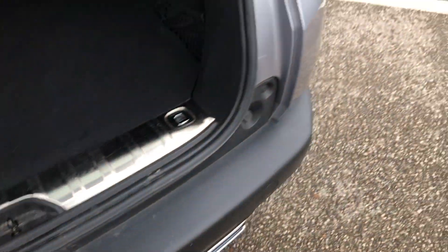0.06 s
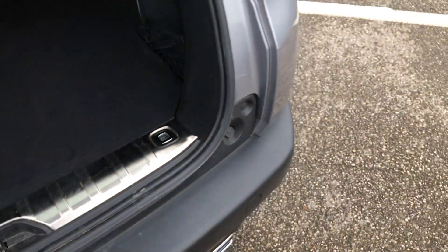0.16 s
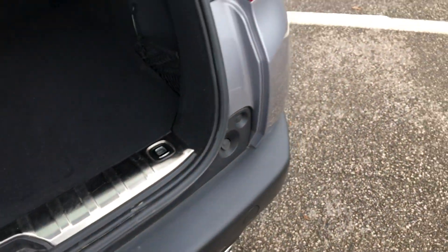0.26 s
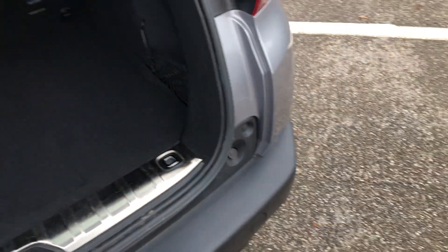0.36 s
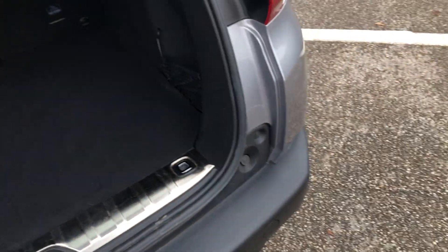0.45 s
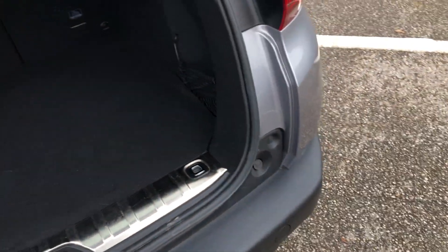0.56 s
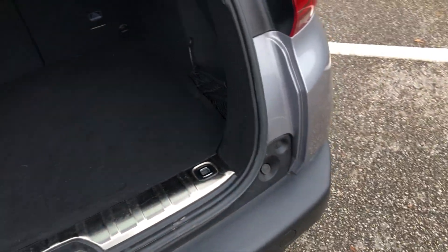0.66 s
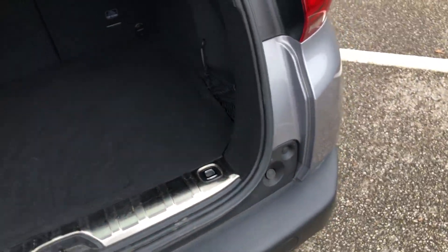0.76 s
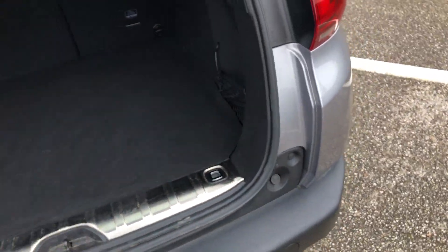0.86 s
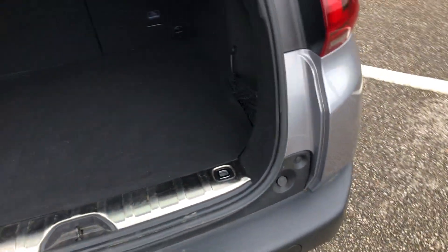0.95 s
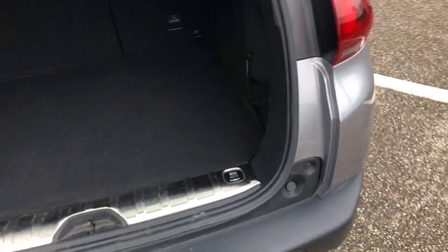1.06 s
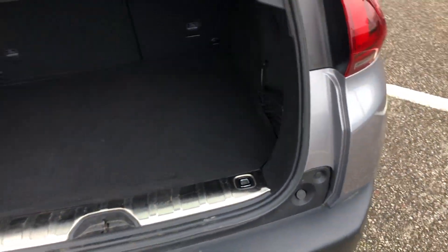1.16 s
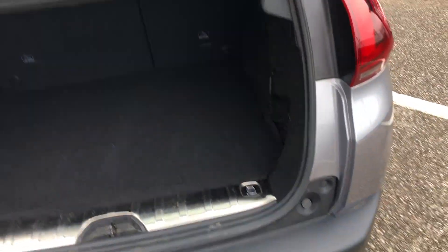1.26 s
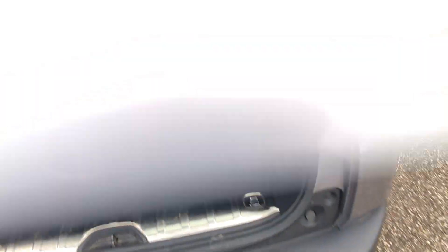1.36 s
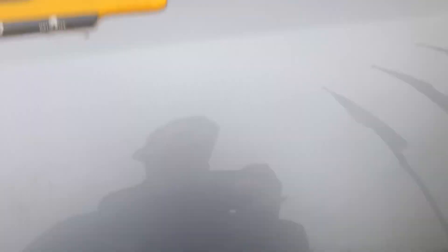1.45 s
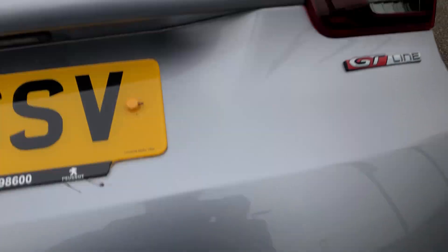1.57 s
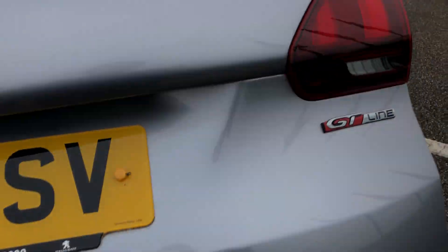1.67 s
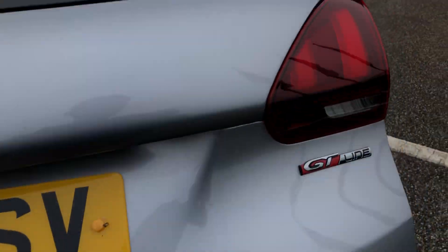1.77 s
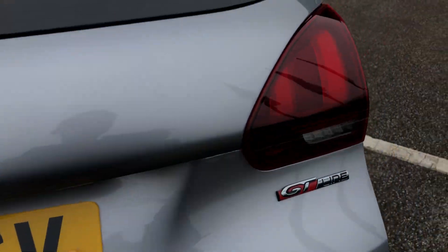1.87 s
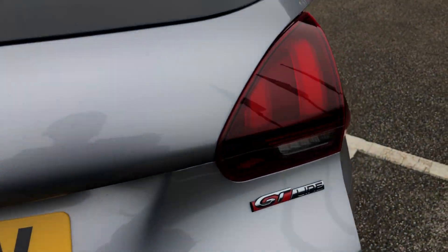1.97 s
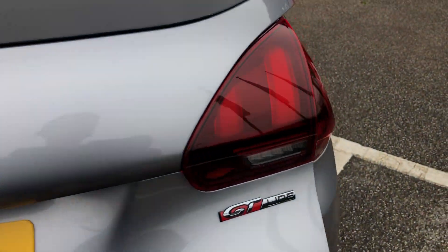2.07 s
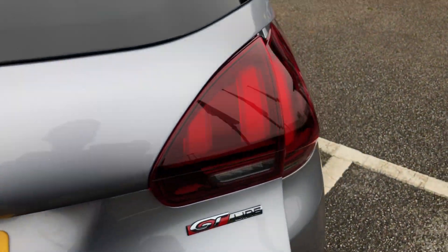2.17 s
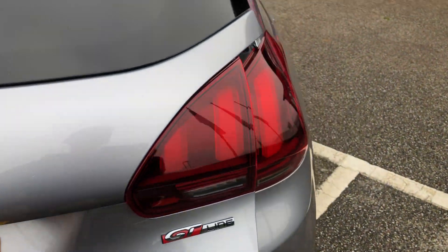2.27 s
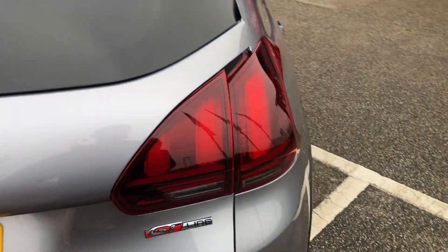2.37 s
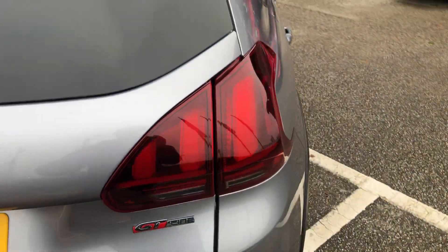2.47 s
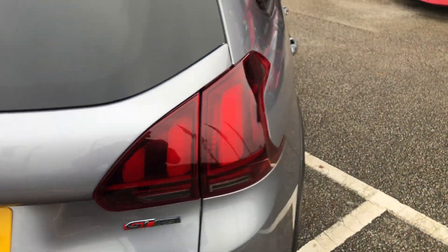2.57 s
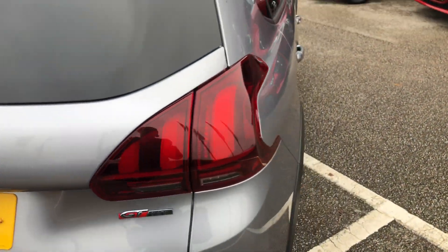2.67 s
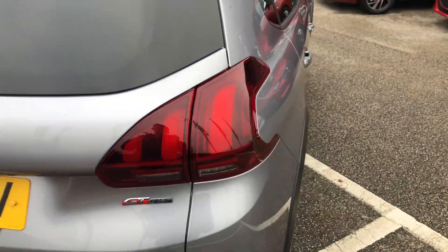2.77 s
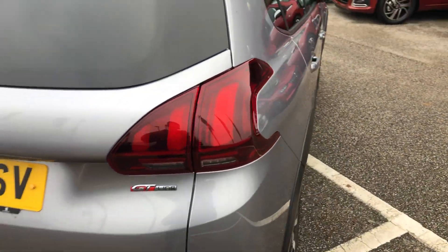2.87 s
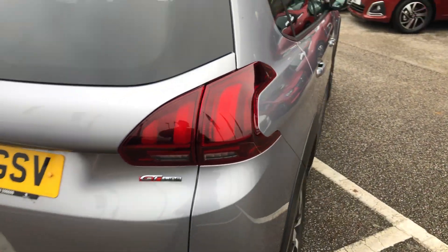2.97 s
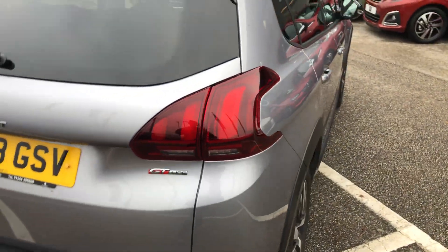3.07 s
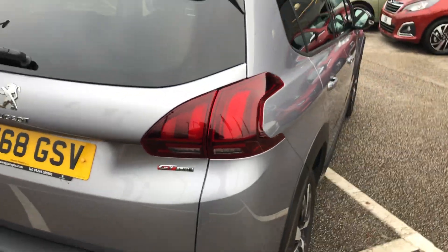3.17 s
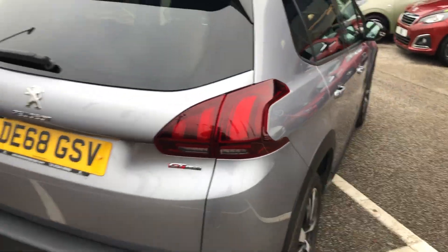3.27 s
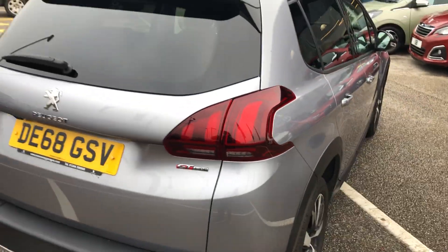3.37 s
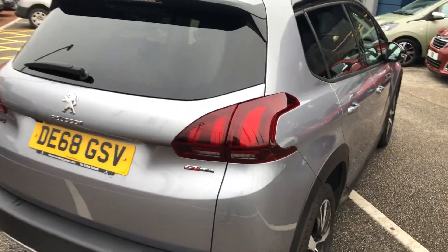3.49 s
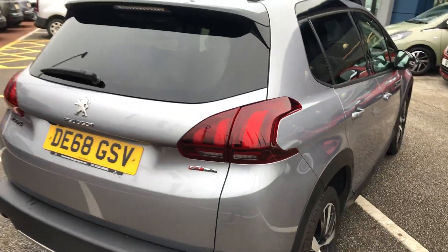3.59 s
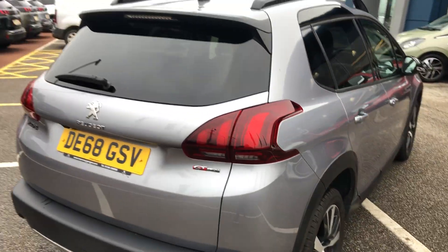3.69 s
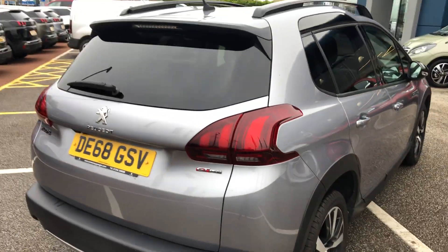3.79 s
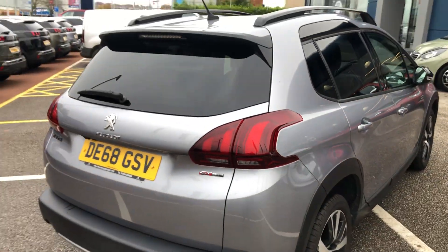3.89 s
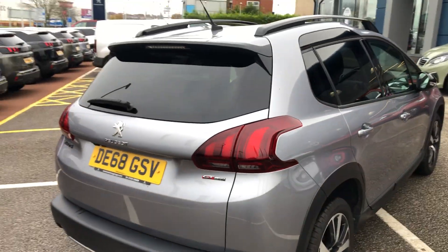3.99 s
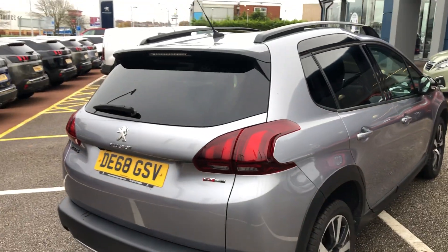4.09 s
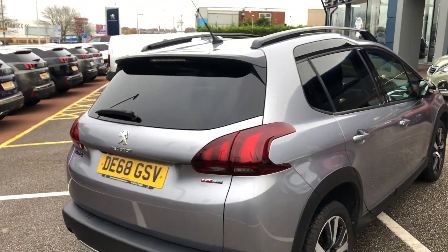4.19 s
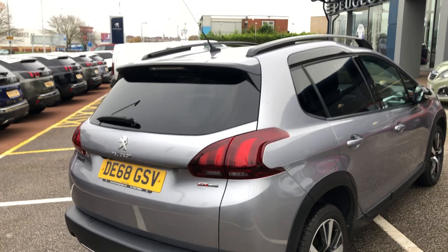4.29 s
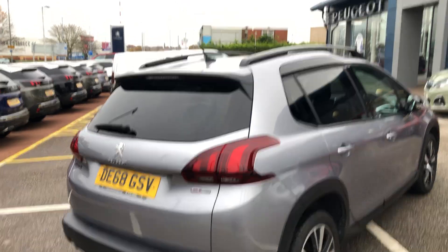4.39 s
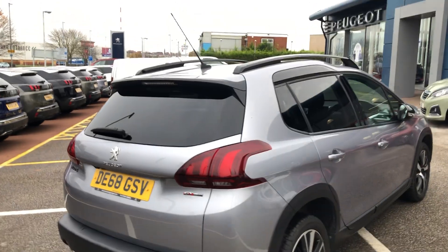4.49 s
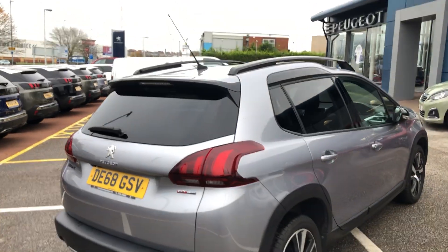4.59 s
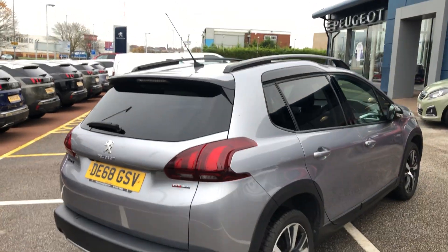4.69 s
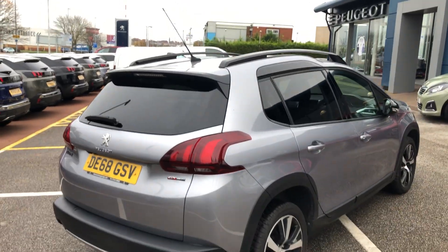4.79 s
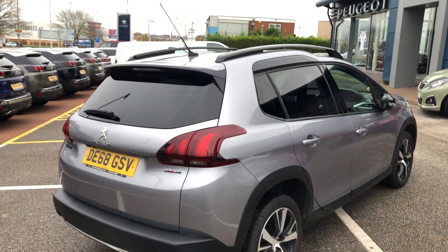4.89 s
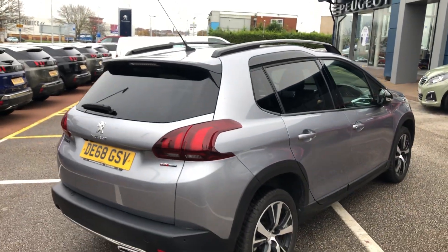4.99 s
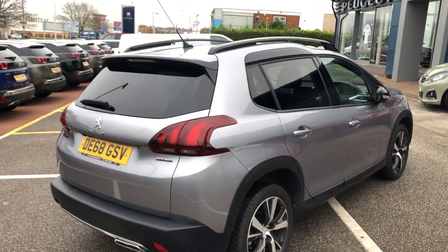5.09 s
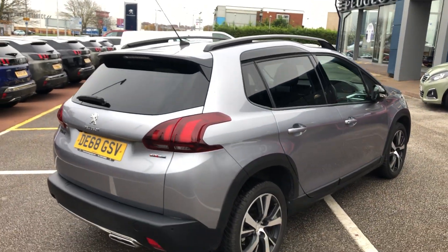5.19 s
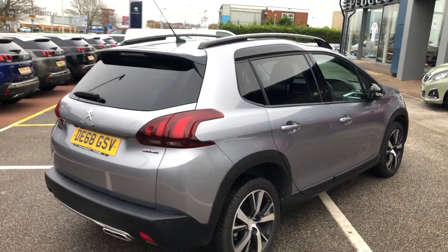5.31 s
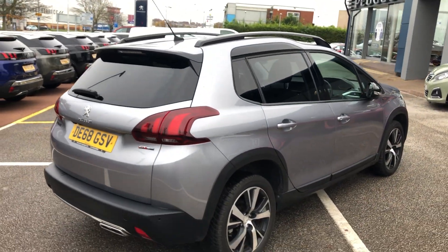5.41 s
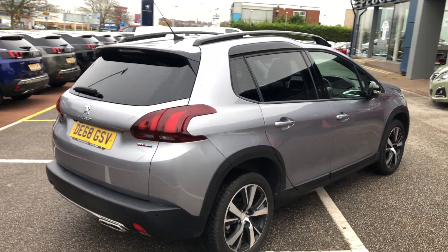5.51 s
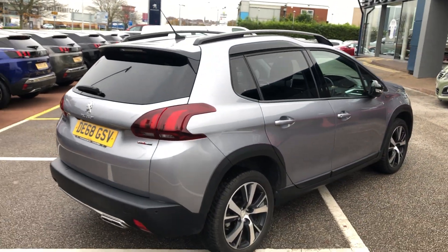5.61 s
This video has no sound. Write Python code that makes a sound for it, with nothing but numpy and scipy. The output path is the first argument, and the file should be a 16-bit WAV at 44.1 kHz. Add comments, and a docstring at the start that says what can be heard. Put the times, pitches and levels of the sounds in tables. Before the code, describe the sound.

Outdoors, soft knocks lead to one loud slam of a car boot lid, followed by small clicks, distant traffic and light wind.

```python
"""Tailgate slam in an open car lot

A hatchback's tailgate is pulled down by hand, knocking dully, and slammed: the latch touches and
snaps home, the steel panel rings and the trapped cabin air booms. Shoes scuff gritty asphalt, trim
clicks and a sleeve swishes. Distant traffic, a light breeze and a thin, high sizzle sit behind."""
import sys
import numpy as np
from scipy import signal
from scipy.fft import rfft, irfft
from scipy.io import wavfile
from scipy.ndimage import uniform_filter1d

SR = 44100
rng = np.random.default_rng(int(sys.argv[2]) if len(sys.argv) > 2 else 0)


def generate_wav(sig):
    """Save sig (samples, or channels by samples) to the path in sys.argv[1] as 16-bit PCM at SR."""
    pcm = np.round(np.clip(np.atleast_2d(sig).T, -1, 1) * 32767).astype(np.int16)
    wavfile.write(sys.argv[1], SR, pcm)


N = 249165
T = np.arange(N) / SR
AGE = T[:SR]  # the second after a blow


def amp(db):
    """Decibels to gain."""
    return 10 ** (np.asarray(db) / 20)


def unit(x):
    """Scale to rms 1."""
    return x / np.std(x)


def add(out, start, x):
    """Mix x in at start seconds."""
    i = int(start * SR)
    out[i:i + len(x)] += x[:N - i]


def bell(t, middle, half):
    """A smooth swell to 1 and back."""
    return np.exp(-((t - middle) / half) ** 2)


def fade(t60):
    """Free decay, 60 dB in t60 seconds."""
    return np.exp(-np.log(1000) * AGE / t60)


def ring(modes):
    """Sum of struck modes: (frequency [Hz], level [dB], t60 [s])."""
    return sum(amp(db) * fade(t60) * np.sin(2 * np.pi * hz * AGE) for hz, db, t60 in modes)


def wobble(rate_hz):
    """Smooth random modulation with a spread of 1."""
    hold = int(SR / rate_hz)
    steps = np.repeat(rng.standard_normal(N // hold + 1), hold)
    return unit(uniform_filter1d(steps, hold)[:N])


def noise(colour, size):
    """Noise of rms 1, shaped by points of (frequency [Hz], relative level [dB])."""
    hz, db = np.transpose(colour)
    bins_hz = np.fft.rfftfreq(size, 1 / SR) + 1
    gain = amp(np.interp(np.log(bins_hz), np.log(hz), db))
    return unit(irfft(rfft(rng.standard_normal(size)) * gain, size))


def noise_band(hz, q):
    """A second of noise through one resonance."""
    resonance = signal.iirpeak(hz, max(q, 1), fs=SR)
    return unit(signal.lfilter(*resonance, rng.standard_normal(SR)))


def soften(x, hz):
    """Roll off the treble above hz."""
    return signal.sosfilt(signal.butter(2, min(hz, 0.45 * SR), fs=SR, output="sos"), x)


def traffic(level_db=-50.5, rise_start=2.64, rise_db_per_s=1.13, drift_db=0.46):
    """Tyre wash of distant roads: steady, then growing as the listener steps clear of the car."""
    # road wash spectrum: (frequency [Hz], relative density [dB])
    colour = [(50, -32), (100, -9.5), (270, -6), (400, -10.5), (720, -12.5), (930, -7.5), (1200, -13),
              (1500, -14), (1850, -16.5), (2400, -24), (4300, -30.5), (6300, -37.5), (9500, -45),
              (15500, -49.5)]
    rise_db = rise_db_per_s * np.maximum(T - rise_start, 0)
    return noise(colour, N) * amp(level_db + rise_db + drift_db * wobble(8.7))


def breeze(lull_db=-52.5, buffet_db=1.4):
    """A light breeze buffets the microphone in low, rumbling gusts."""
    # wind rumble spectrum: (frequency [Hz], relative density [dB])
    colour = [(20, -25), (40, -4), (62, 2), (100, -3.5), (170, -9.5), (300, -19), (700, -57)]
    # gusts: (middle [s], half length [s], lift [dB])
    gusts = [(3.45, 0.24, 3), (4.53, .11, 7.5), (4.98, .09, 7), (5.45, .42, 5.5)]
    gust_db = sum(lift * bell(T, middle, half) for middle, half, lift in gusts)
    return noise(colour, N) * amp(lull_db + gust_db + buffet_db * wobble(10))


def sizzle(upper_ratio=1.37, upper_db=-11.5, wander_hz=100, edge_s=.25, pulse_hz=3.9, pulse_fade_s=1.3):
    """Narrow, wavering hiss with a weaker band above; each spell swells or fades as its pitch sinks."""
    # spells of sizzle: (start [s], length [s], level [dB], swell [dB/s], first pitch [Hz],
    # settled pitch [Hz], settling time [s], width [Hz], pulse depth [dB])
    spells = [(.94, 1.03, -51.5, -30.5, 9400, 7850, .11, 450, 0),
              (3.04, 3.0, -78.5, 3.9, 8100, 7330, 2.2, 330, 7)]
    out = np.zeros(N)
    for start, length, db, swell, first_hz, settled_hz, settling, width_hz, depth_db in spells:
        age = np.clip(T - start, 0, length)
        gate = np.clip(np.minimum(age, length - age) / edge_s, 0, 1)
        pulse_db = -depth_db * np.exp(-age / pulse_fade_s) * np.cos(2 * np.pi * pulse_hz * age)
        hz = settled_hz + (first_hz - settled_hz) * np.exp(-age / settling) + wander_hz * wobble(14)
        phase = 2 * np.pi * np.cumsum(hz) / SR
        lower = unit(soften(rng.standard_normal(N), width_hz) * np.sin(phase))
        upper = unit(soften(rng.standard_normal(N), width_hz) * np.sin(upper_ratio * phase))
        bands = lower + amp(upper_db + 2.5 * wobble(8)) * upper
        out += bands * gate * amp(db + swell * age + pulse_db + 1.5 * wobble(14))
    return out


def lot_echo(x, wet_db=-30, t60=0.45, dull_hz=2500, build_s=.02):
    """Parked cars and the showroom front scatter a faint, dull echo."""
    tail = soften(rng.standard_normal(SR), dull_hz) * fade(t60) * (1 - np.exp(-AGE / build_s))
    return amp(wet_db) * signal.fftconvolve(x, tail / np.linalg.norm(tail))[:N]


def sleeve(attack_s=0.11, release_s=0.16, rustle_db=-68, rustle_end=2.9, fade_s=.35, flutter_db=1):
    """Cloth hiss: each arm stroke swells over a faint rustle that dies away once the lid is shut."""
    # arm strokes: (peak time [s], level [dB])
    strokes = [(.07, -58.5), (1.07, -55.5), (1.26, -54.5), (1.57, -62), (1.94, -64.5), (2.12, -65),
               (2.84, -62.5), (3.68, -74)]
    # cloth hiss spectrum: (frequency [Hz], relative density [dB])
    colour = [(2500, 2), (4200, -0.5), (6500, 0.5), (8500, 1), (11000, 0.5), (13000, -1), (15500, 3)]
    rustle = amp(rustle_db) * np.exp(-np.maximum(T - rustle_end, 0) / fade_s)
    power = rustle ** 2
    for peak, db in strokes:
        stroke = amp(db) * bell(T, peak, np.where(T < peak, attack_s, release_s))
        power += stroke ** 2
    return noise(colour, N) * np.sqrt(power) * amp(flutter_db * wobble(40.1))


def clicks(t60=0.023, snap_db=-5, snap_hz=12000):
    """Dry clicks of trim and grit, snappier when high and broad."""
    # trim and grit clicks: (time [s], level [dB], centre [Hz], sharpness [Q])
    hits = [(.5358, -37, 1600, 1.2), (.829, -46.5, 3300, 0.87), (1.130, -40.5, 1490, 1.1),
            (2.2825, -35.5, 3010, 7.5), (2.440, -44.5, 4600, 2.1), (2.4583, -39.5, 1600, 1.4),
            (2.926, -45.5, 5230, 1.2), (2.972, -39, 2110, 0.88), (3.298, -40, 1100, 1.7),
            (3.3119, -33.5, 1000, 2.3), (3.3347, -41, 2300, 1.4), (3.347, -35.5, 1410, 1.3),
            (3.3568, -42, 2930, 5), (3.3576, -33, 1020, 2.4), (3.381, -38, 1050, 2.1),
            (4.319, -52, 3300, 2.4)]
    out = np.zeros(N)
    for start, db, hz, q in hits:
        body = unit(soften(noise_band(hz, q), 2 * hz))
        snap = amp(snap_db) * hz / snap_hz / q * noise_band(snap_hz, 1)
        add(out, start, amp(db) * (body + snap) * fade(t60))
    return out


def scuffs(grit_db=2.5, rub_q=1.8, hiss_hz=12000):
    """Soles and trim rub briefly, catching and slipping on grit."""
    # rubs: (middle [s], half length [s], rub level [dB], centre [Hz], fine hiss level [dB])
    rubs = [(.55, .028, -48, 520, -69), (1.101, .016, -45, 900, -75), (1.137, .023, -43.3, 1030, -75),
            (1.65, .025, -61, 4100, -85), (2.104, 0.098, -59, 3900, -75), (2.24, 0.019, -44, 400, -59.5),
            (2.696, .018, -48.5, 2230, -55.5), (2.919, .03, -56, 1470, -72), (3.328, .025, -40.5, 620, -63),
            (3.644, .016, -68, 11000, -60), (4.323, .013, -46, 400, -74)]
    out = np.zeros(N)
    for middle, half, db, hz, hiss_db in rubs:
        grit = amp(grit_db * wobble(400)[:SR])
        rub = amp(db) * unit(soften(noise_band(hz, rub_q), 3 * hz) * grit)
        hiss = amp(hiss_db) * unit(noise_band(hiss_hz, 1) * grit)
        add(out, middle - .5, (rub + hiss) * bell(AGE, 0.4992, half))
    return out


def hand_knocks(spread=0.3, contact_s=0.0044):
    """A padded hand pushes slowly and wakes mostly the lid modes near the pace of its push."""
    # dull knocks on the lid, with one faint thump after it shuts:
    # (time [s], level [dB], centre of the push [Hz])
    knocks = [(.548, -31, 285), (.806, -35, 292), (.898, -35, 231), (.948, -37.5, 169), (1.098, -33.5, 196),
              (1.435, -33.5, 160), (1.458, -31, 170), (1.497, -25, 256), (1.550, -19.5, 191),
              (1.567, -22.5, 135), (1.594, -22.5, 460), (1.6, -23.5, 205), (1.615, -28, 140),
              (1.644, -27.5, 128), (1.755, -35, 158), (2.165, -33.5, 149), (2.178, -34.5, 87),
              (3.459, -35.5, 295)]
    # modes of the lid with its trim: (frequency [Hz], relative level [dB], t60 [s])
    lid_modes = [(82.7, 4, 0.15), (122.3, 4.5, 0.047), (151.5, 6.5, 0.066), (205, 6, 0.051),
                 (274, 1, 0.062), (380, -12, 0.11), (474, 3.5, 0.039)]
    out = np.zeros(N)
    attack = 1 - np.exp(-(AGE / contact_s) ** 2)
    for start, knock_db, push_hz in knocks:
        woken = [(hz, db - 6 * np.log2(hz / push_hz) ** 2 / spread, t60) for hz, db, t60 in lid_modes]
        add(out, start, amp(knock_db) * ring(woken) * attack)
    return out


def cabin_boom(start=2.5808, push_hz=61, push_s=0.055, push_db=-15.5, sway_start=2.595, build_s=0.027):
    """The lid squeezes the cabin air for a few heavy cycles, then air and shell sway on."""
    # modes of cabin air and body shell: (frequency [Hz], level [dB], t60 [s])
    cabin_modes = [(49.2, -39, 0.98), (71.9, -27, 0.82), (78, -37, 0.57), (115.6, -32, 0.32),
                   (144, -32.5, 0.38), (165.6, -31.5, 0.27), (216, -30, 0.34)]
    out = np.zeros(N)
    swell = np.sin(np.pi * np.minimum(AGE / push_s, 1)) ** 2
    add(out, start, amp(push_db) * swell * np.sin(2 * np.pi * push_hz * AGE))
    add(out, sway_start, ring(cabin_modes) * (1 - np.exp(-AGE / build_s)))
    return out


def panel_ring(start=2.5835, gain_db=1.5, build_s=0.0025):
    """The whole steel skin rings once the lid comes home against its stops."""
    # modes of the tailgate skin: (frequency [Hz], relative level [dB], t60 [s])
    skin_modes = [(277.6, -13.5, 0.11), (332, -23.5, 0.25), (398, -20, 0.16), (433.5, -27, 0.16),
                  (525, -33, 0.22), (800, -23.5, 0.14), (870, -24.5, 0.15), (1037, -29, 0.12),
                  (1113, -32, 0.2), (1175, -38, 0.16), (1246, -39, 0.23), (1430, -37, 0.16),
                  (1704, -38, 0.14), (2013, -31.5, 0.13), (2390, -26, 0.08), (2616, -29, 0.11),
                  (3300, -34, 0.13), (3340, -37, 0.1), (3570, -34, 0.12), (3830, -36, 0.13),
                  (4100, -44, 0.11), (4340, -43, 0.1), (4920, -43, 0.13)]
    out = np.zeros(N)
    add(out, start, amp(gain_db) * ring(skin_modes) * (1 - np.exp(-AGE / build_s)))
    return out


def clatter():
    """Dense panel modes as noise bands; the low ones take longer to build and to die."""
    # the skin's crowd of finer modes: (frequency [Hz], relative density [dB], t60 [s])
    bands = [(60, -6, .5), (130, -3.5, 0.7), (323, 0.5, 0.31), (666, -4.5, 0.18), (970, 1, 0.15),
             (1500, -11.5, 0.17), (2400, -4.5, 0.085), (3940, -7, 0.11), (5800, -22, 0.15),
             (9000, -19.5, .09), (15000, -16, .08)]
    centres, levels, decays = np.transpose(bands)
    spectrum = rfft(noise(np.transpose([centres, levels]), SR))
    log_hz = np.log(np.arange(len(spectrum)) + 1)
    out = np.zeros(SR)
    for hz, t60, solo in zip(centres, decays, np.eye(len(centres))):
        crossfade = np.interp(log_hz, np.log(centres), solo)  # 1 at this centre, 0 at its neighbours
        out += irfft(spectrum * crossfade, SR) * fade(t60) * (1 - np.exp(-AGE * hz))
    return out


def slam(crack_t60=0.032):
    """Latch and seal meet in a quick run of blows; each cracks and shakes another part of the lid."""
    # latch and panel blows: (time [s], level [dB], brightness [Hz], relative crack level [dB])
    blows = [(2.5700, -21, 1430, -15), (2.5812, -21, 7000, 4), (2.5840, -20, 4500, 4.5),
             (2.5879, -24.5, 7000, 4), (2.5950, -25.5, 9000, 0.5), (2.6050, -36, 9000, -10),
             (2.6133, -27.5, 1110, -18), (2.6272, -24.5, 1190, -11), (2.6359, -36, 1400, -9),
             (2.6490, -34.5, 2000, -6)]
    # crack spectrum of the steel latch: (frequency [Hz], relative density [dB])
    latch_colour = [(500, -21), (1500, 3.5), (2500, 1), (4200, -4.5), (5500, -15), (7000, -20),
                    (15500, -16)]
    out = np.zeros(N)
    for start, db, bright_hz, crack_db in blows:
        crack = amp(crack_db) * noise(latch_colour, SR) * fade(crack_t60)
        add(out, start, amp(db) * (soften(clatter(), bright_hz) + crack))
    return out


def scene():
    """The tailgate and the person beside it, over the ambience of the open lot, in mono."""
    near = slam() + panel_ring() + cabin_boom() + hand_knocks() + clicks() + scuffs()
    return (near + lot_echo(near) + sleeve() + sizzle() + traffic() + breeze())[None]


def record(dry, low_cut_hz=26, ceiling=0.49, top_hz=15850):
    """The phone thins the deepest bass, rounds the loudest peaks and cuts the top."""
    thin = signal.sosfilt(signal.butter(2, low_cut_hz, "high", fs=SR, output="sos"), dry)
    rounded = ceiling * np.tanh(thin / ceiling)
    return signal.sosfilt(signal.ellip(10, .2, 70, top_hz, fs=SR, output="sos"), rounded)


dry = scene()
out = record(dry)
generate_wav(out)
```